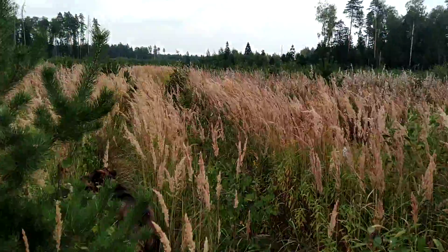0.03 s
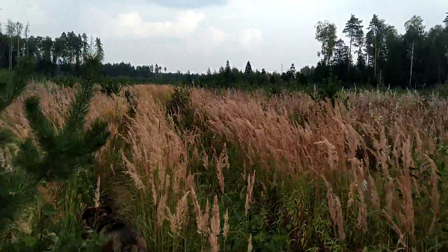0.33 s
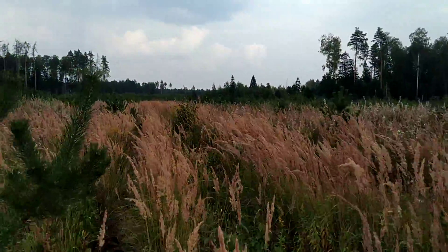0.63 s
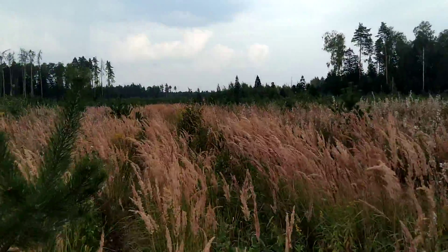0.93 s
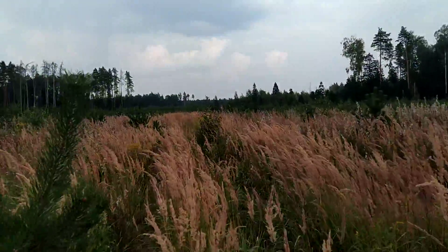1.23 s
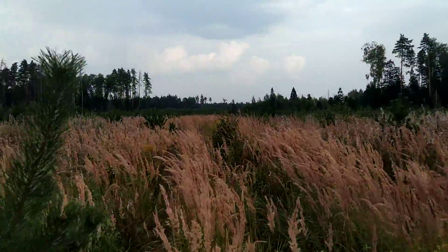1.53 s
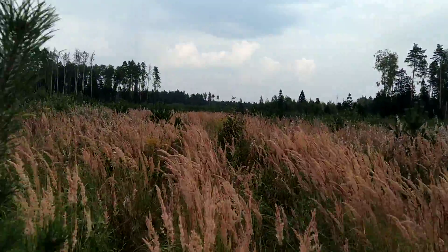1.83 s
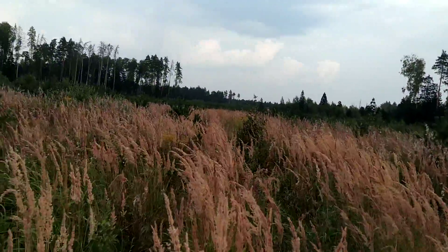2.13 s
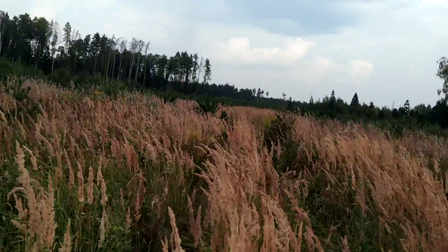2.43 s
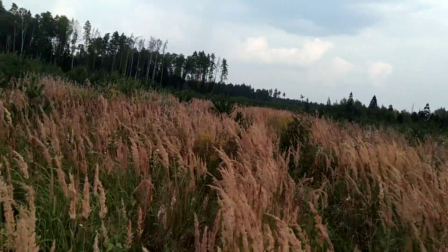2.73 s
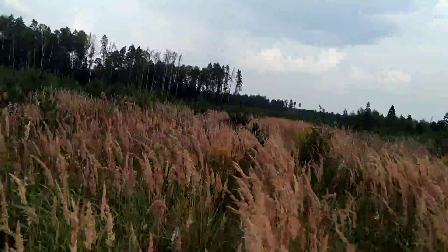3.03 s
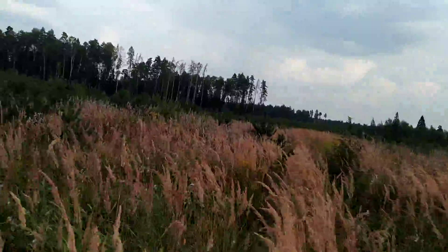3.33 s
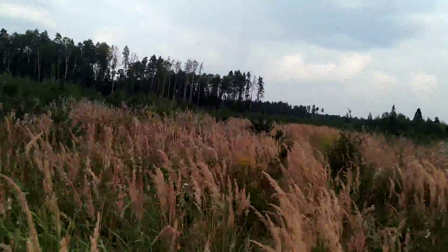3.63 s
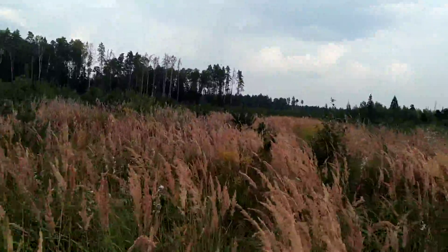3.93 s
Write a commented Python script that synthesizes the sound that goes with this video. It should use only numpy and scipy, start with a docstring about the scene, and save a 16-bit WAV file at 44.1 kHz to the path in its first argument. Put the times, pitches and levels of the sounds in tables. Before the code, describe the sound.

Tall dry grass swishes against someone's legs in an open field, with faint crunching steps. The rustle eases after 1 second, returns around 2.2, and is loudest near 2.9, where stems snap sharply; another snap comes at 3.4. From about 1 second a shrill cricket buzz grows on the left. Light wind rumbles and thumps on the microphone throughout, mostly on the right, over a faint distant hush.

```python
"""Tall dry grass swishes, crunches and snaps as someone wades slowly through an open field.
Stalks and seed heads rub past the legs, dead leaves crackle underfoot and stems break.
Close by on the left a bush-cricket buzzes by scraping its wings together, with others farther off.
Light wind rumbles and thumps on the microphone, mostly on the right, over a faint distant hush."""
import sys
import numpy as np
from scipy import signal
from scipy.fft import rfft, irfft
from scipy.io import wavfile
from scipy.ndimage import uniform_filter1d

SR = 44100
rng = np.random.default_rng(int(sys.argv[2]) if len(sys.argv) > 2 else 0)


def int16_out(signal):
    """Quantize to a 16-bit WAV file."""
    q = np.round(np.clip(np.atleast_2d(signal).T, -1, 1) * 32767)
    wavfile.write(sys.argv[1], SR, q.astype(np.int16))


N = 176400
T = np.arange(N) / SR
FLICKER_PER_S = 27   # pace of the small random changes in loudness

# the brushed stalks lie mostly to the left: (frequency [Hz], left minus right [dB])
GRASS_SIDE = [(500, -1), (2000, 4.5), (5500, 4), (8000, 10.5), (10000, 1.5), (13000, 2)]


def grass():
    """Stalks slide and tap against each other: a smooth hiss, many tiny clicks and a few lone ticks."""
    # how hard the legs brush the grass: (time [s], level [dB])
    brushing = [(0, -44), (.2, -46), (.3, -43.5), (.53, -46.5), (.64, -43), (.83, -40), (.89, -40.5),
                (.96, -45.5), (1.1, -50.5), (1.25, -53), (1.7, -49.5), (1.95, -53), (2.1, -49.5),
                (2.17, -43.5), (2.25, -41.5), (2.3, -48), (2.57, -44.5), (2.68, -48.5), (2.815, -46.5),
                (2.83, -38), (2.853, -39), (2.88, -32.5), (2.925, -39.5), (3.03, -40.5), (3.12, -47.5),
                (3.27, -49.5), (3.31, -45), (3.48, -44), (3.56, -42), (3.63, -42), (3.78, -47.5),
                (3.9, -47.5), (4, -52)]
    # tone of the swish: (frequency [Hz], relative level [dB])
    tone = [(300, -13.5), (1000, -15.5), (2000, -11.5), (2900, -16), (3700, -6.5), (4600, -7.5), (5800, -4),
            (7300, -0.5), (9200, 0), (11600, -4), (14700, -8)]
    # fine seed heads sound brighter than stalks: (time [s], tilt toward the treble [dB per octave])
    fineness = [(.8, 0), (1.3, 1.4), (2.3, .5), (2.9, -0.6), (3.3, 0.85), (4, 1.5)]
    click_share, tick_band_hz = .3, (1930, 9200)
    clicks = np.sqrt(click_share) * tiny_clicks(per_s=7000, spread_db=3)
    rubbing = np.sqrt(1 - click_share) * rng.standard_normal((2, 2, N))
    swish = shape_tone(clicks + rubbing, tone, flicker_db=1.1, side=GRASS_SIDE, tilt_db=in_time(fineness)[0])
    ticks = unit_level(band(tiny_clicks(per_s=84, spread_db=3)[0], *tick_band_hz))
    ticks *= pan(at_hz(GRASS_SIDE, tick_band_hz[0]))
    level_db = in_time(brushing)[0] + .6 * drift(FLICKER_PER_S)
    return from_db(level_db) * (swish + from_db(-20) * ticks)


def scrapes():
    """Single plants rasp past: dead leaves sound low, coarse stalks higher, fine seed heads highest."""
    # one plant scraping by: (time [s], length [s], level [dB], pitch [Hz])
    plants = [(0.268, 0.071, -50, 4640), (0.268, 0.21, -54, 14600), (0.817, 0.086, -47.5, 4300),
              (1.727, 0.06, -57, 750), (2.877, 0.046, -44, 4040), (3.555, 0.12, -44.5, 13300)]
    out = 0
    for s, length, db, hz in plants:
        rasp = unit_level(band(rng.standard_normal((2, N)), *band_edges(hz, sharpness=3.3)))
        out = out + swells([(s, length, db)]) * pan(at_hz(GRASS_SIDE, hz)) * rasp
    return out


def footsteps():
    """Dead leaves and stalks on the ground crackle dully under each press of a foot."""
    # a foot presses down: (time [s], length [s], level [dB])
    presses = [(.445, 0.016, -57), (.5, 0.095, -57.5), (.815, 0.029, -52.5), (1.165, 0.058, -56),
               (2.2, 0.29, -64), (2.88, 0.058, -51), (3.0, 0.21, -54.5), (3.51, 0.35, -58.5),
               (3.79, 0.11, -56.5)]
    # tone of the crunch: (frequency [Hz], relative level [dB])
    tone = [(120, -28), (230, -4), (500, 3.5), (1000, 3.5), (1800, 0), (3000, -2), (6000, -64)]
    crackles = tiny_clicks(per_s=700, spread_db=4)
    return swells(presses) * shape_tone(crackles, tone, flicker_db=2)


def snaps():
    """A hollow stem breaks with one short click, a few splinters and a dull knock."""
    # a stem breaks: (time [s], relative level [dB], pitch [Hz], left minus right [dB])
    stems = [(.819, -55, 1500, 1), (1.1374, -30, 1300, 28), (1.278, -41, 910, -2), (1.6419, -29, 2500, 7),
             (1.7827, -34, 1300, 7), (2.8285, -24, 7000, 1), (2.838, -24, 1410, 5),
             (2.8383, -19.5, 6300, -2), (2.9382, -16.5, 7440, -1), (3.062, -35, 1880, 7),
             (3.393, -19, 8200, 6), (3.448, -37, 1260, 0), (3.563, -32, 2100, 5)]
    splinter_fade_s, knock_band_hz = .0012, (264, 960)
    out, t = np.zeros((2, N + SR)), T[:SR // 20]
    for s, db, hz, side_db in stems:
        splinters = from_db(-22) * rng.standard_normal(len(t)) * np.exp(-t / splinter_fade_s)
        force = (t == 0) + splinters
        edges_hz = band_edges(hz, sharpness=1)
        click = band(band(force, *edges_hz), *edges_hz)
        snap = click + from_db(-7.5) * band(force, *knock_band_hz)
        start = int(s * SR)
        out[:, start:start + len(t)] += from_db(db - 5) * pan(side_db) * snap / np.abs(snap).max()
    return out[:, :N]


def crickets():
    """Each stroke drags a row of tiny teeth that rings the wings; far crickets blur into a shrill hiss."""
    # how fast the wings move: (time [s], strokes [per s])
    stroke_rate = [(1.1, 48.6), (1.4, 48.25), (1.7, 47.48), (2.0, 48.18), (2.4, 47.41), (2.8, 48.58),
                   (3.1, 47.43), (3.5, 47.24), (3.75, 45.9), (4.0, 45.33)]
    # loudness of the crickets: (time [s], level [dB])
    loudness = [(0, -63), (1.0, -60), (1.25, -53), (1.5, -52), (2.0, -52.5), (2.7, -50.5), (3.1, -48.5),
                (4, -47)]
    # pitches at which the wings ring: (frequency [Hz], width [Hz], relative level [dB])
    wings = [(8110, 430, 3.5), (8800, 580, 0), (9750, 1550, -5)]
    stroke_width, stroke_vary_db = .115, .9   # the width is a fraction of one stroke
    teeth_per_s, wing_band_hz = 3200, (7700, 11200)
    strokes = np.cumsum(in_time(stroke_rate)[0]) / SR
    pressure = np.exp(-.5 * ((strokes % 1 - .5) / stroke_width) ** 2)
    pressure *= from_db(stroke_vary_db * rng.standard_normal(SR)[strokes.astype(int)])
    teeth_passed = np.cumsum(teeth_per_s * np.exp(.22 * drift(300))) / SR
    tooth_clicks = np.diff(np.floor(teeth_passed), prepend=0)
    rasp = pressure * tooth_clicks * (1 + .35 * rng.standard_normal((2, N)))
    ringing = sum((-1) ** k * from_db(db) * resonate(rasp, hz, width)
                  for k, (hz, width, db) in enumerate(wings))
    near = unit_level(band(ringing, *wing_band_hz))
    chorus = resonate(rng.standard_normal((2, N)), hz=8190, width_hz=1500)
    far = from_db(-3) * unit_level(band(chorus, *wing_band_hz))
    return from_db(in_time(loudness)) * (pan(side_db=17) * near + pan(side_db=21) * far)


def wind():
    """Swirling air rumbles on each side of the microphone, and short gusts hit the right side."""
    # tone of the rumble: (frequency [Hz], relative level [dB])
    tone = [(42, -6), (58, 4), (80, -3.5), (110, -10), (160, -23.5), (250, -44), (450, -49)]
    # strength of the breeze: (time [s], relative level left [dB], relative level right [dB])
    breeze = [(0, -60, -42), (.65, -56.5, -52), (1.05, -60, -50.5), (1.5, -41.5, -46), (1.9, -55.5, -41.5),
              (2.25, -67, -53), (2.6, -56.5, -50), (3.0, -64, -60.5), (3.17, -47.5, -62), (3.55, -54, -45),
              (4, -55, -55)]
    # a gust hits: (time [s], length [s], relative level [dB])
    gusts = [(.145, 0.11, -38.5), (.34, 0.023, -38.5), (.47, .11, -38.5), (.86, 0.075, -35),
             (.99, 0.093, -41.5), (1.12, 0.059, -50), (1.53, 0.11, -40), (1.78, 0.028, -42),
             (1.89, 0.061, -43), (2.14, 0.18, -44), (2.48, 0.06, -41), (3.47, 0.038, -43.5),
             (3.86, 0.055, -43.5), (3.985, 0.077, -38)]
    even_out_s, flutter_band_hz = .0343, (123, 213)
    hz = np.maximum(np.arange(N // 2 + 1) * SR / N, 1)
    top_hz = tone[-1][0]
    tone_gain = from_db(at_hz(tone, hz)) / np.maximum(hz / top_hz, 1) ** 2
    rumble = irfft(rfft(rng.standard_normal((2, N))) * tone_gain, N)
    # even out the noise so that the breeze and gusts set its loudness
    rumble /= np.sqrt(uniform_filter1d(rumble ** 2, int(even_out_s * SR)) + 1e-20)
    left, right = from_db(in_time(breeze))
    force = np.array([left, np.hypot(right, from_db(4) * swells(gusts))])
    flutter = from_db(-24.5) * unit_level(band(rng.standard_normal((2, N)), *flutter_band_hz))
    return from_db(-1) * force * (rumble + flutter)


def thumps():
    """The sharpest swirls of air slap the right side of the microphone with one short push."""
    # a slap of air: (time [s], peak level [dB])
    slaps = [(.106, -34.5), (.126, -30.5), (1.352, -34), (1.972, -38.5), (2.055, -36), (2.467, -37.5)]
    band_hz = (47.5, 205)
    out = np.zeros((2, N))
    for s, db in slaps:
        push = np.arange(N) == int(s * SR)
        thump = band(band(push, *band_hz), *band_hz)
        out[1] += from_db(db) * thump / np.abs(thump).max()
    return out


def far_wind():
    """Wind far off in the field and the trees makes a faint, flickering hush."""
    # tone of the hush: (frequency [Hz], relative level [dB])
    tone = [(100, -3), (300, -2), (600, -2.5), (1200, -5), (2000, -5), (3000, -3.5), (6000, -43),
            (15000, -7.5)]
    return from_db(-61.5) * shape_tone(rng.standard_normal((2, 2, N)), tone, flicker_db=3.5)


def shape_tone(source, tone, flicker_db, side=None, tilt_db=0):
    """Turn four noise streams into stereo, giving each narrow band its own level, flicker and side."""
    # how alike the two ears' sounds are: (frequency [Hz], likeness [1 = same, 0 = unrelated])
    likeness = [(400, 0.83), (800, 0.5), (1400, 0.29), (2500, -0.11)]
    tilt_pivot_hz = 7000
    out, edges_hz = 0, np.geomspace(100, 16500, 23)
    for k, (low, high) in enumerate(zip(edges_hz, edges_hz[1:])):
        hz = np.sqrt(low * high)
        middle, wide = band(source[k % 2], low, high)
        alike = at_hz(likeness, hz)
        stereo = np.sqrt(1 + alike) * middle + np.sqrt(1 - alike) * wide * [[1], [-1]]
        db = at_hz(tone, hz) + flicker_db * drift(FLICKER_PER_S) + tilt_db * np.log2(hz / tilt_pivot_hz)
        place = pan(at_hz(side, hz)) if side else 1
        out = out + from_db(db) * place * stereo
    return unit_level(out)


def tiny_clicks(per_s, spread_db):
    """Four unrelated streams of randomly timed clicks of uneven size."""
    shape = (2, 2, N)
    sizes = from_db(spread_db * np.minimum(rng.exponential(1, shape), 5))
    signs = rng.choice([-1, 1], shape)
    return unit_level(sizes * signs * (rng.random(shape) < per_s / SR))


def swells(rows):
    """Smooth rises and falls in loudness from rows of (middle time [s], length [s], level [dB])."""
    power = sum(from_db(2 * db) * np.exp(-2 * (2 * (T - s) / length) ** 2) for s, length, db in rows)
    return np.sqrt(power)


def drift(rate):
    """A smooth random wobble, about 1 in size; a higher rate makes it faster."""
    step, warm_up = 40, 2000
    memory = np.exp(-2 * np.pi * rate * step / SR)
    noise = rng.standard_normal(N // step + warm_up + 2)
    slow = signal.lfilter([1], [1, -2 * memory, memory ** 2], noise)[warm_up:]
    return np.interp(np.arange(N) / step, np.arange(len(slow)), unit_level(slow))


def band(x, low_hz, high_hz):
    """Keep the sound between two frequencies."""
    sos = signal.butter(2, [low_hz, min(high_hz, SR / 2 - 1)], "band", fs=SR, output="sos")
    return signal.sosfilt(sos, x + 1e-18)


def band_edges(hz, sharpness):
    """Low and high edge of a band around a pitch; sharper means narrower."""
    return hz * np.exp(np.array([-.5, .5]) / sharpness)


def resonate(x, hz, width_hz):
    """Make a sound ring at one pitch."""
    return signal.lfilter(*signal.iirpeak(hz, hz / width_hz, fs=SR), x + 1e-18)


def in_time(rows):
    """Join a table's points with straight lines, giving each column a value at every sample."""
    s, *columns = np.transpose(rows)
    return np.array([np.interp(T, s, column) for column in columns])


def at_hz(points, hz):
    """Read a table at a frequency, with octaves evenly spaced."""
    frequencies, values = np.transpose(points)
    return np.interp(np.log(hz), np.log(frequencies), values)


def pan(side_db):
    """Left and right gains that keep the total power; positive is to the left."""
    return unit_level(from_db([[side_db / 2], [-side_db / 2]]))


def from_db(db):
    """Turn decibels into a multiplier."""
    return 10 ** (np.asarray(db) / 20)


def unit_level(x):
    """Scale to an average (rms) level of 1."""
    return x / np.sqrt(np.mean(x ** 2) + 1e-20)


def scene():
    """The walker, the insects and the wind over the hush of the field."""
    hush = far_wind()
    return grass() + scrapes() + footsteps() + snaps() + crickets() + wind() + thumps() + hush


def record(dry):
    """The deepest bass is softened and the highest treble is cut steeply."""
    low_cut_hz, high_cut_hz = 42, 15700
    dry = signal.sosfilt(signal.butter(4, low_cut_hz, "high", fs=SR, output="sos"), dry)
    return signal.sosfilt(signal.ellip(12, .1, 80, high_cut_hz, fs=SR, output="sos"), dry)


dry = scene()
out = record(dry)
int16_out(out)
```